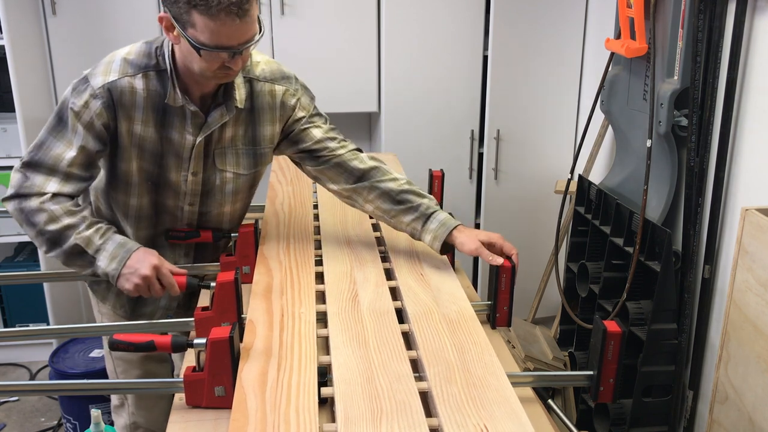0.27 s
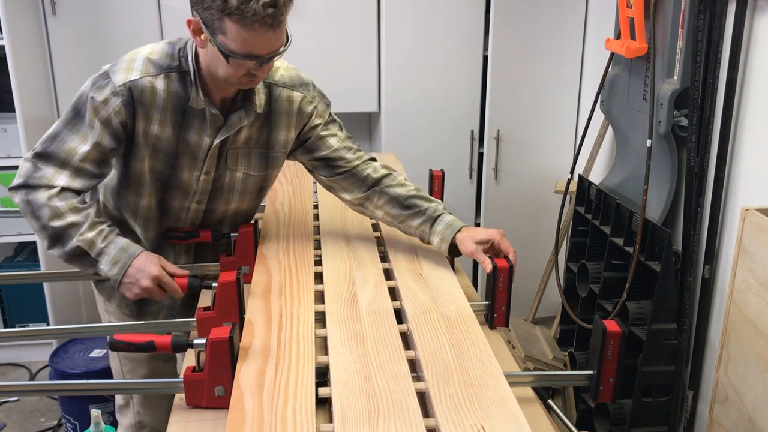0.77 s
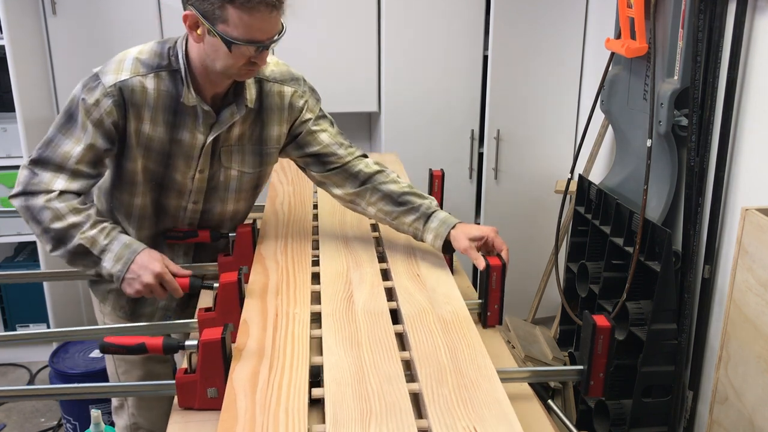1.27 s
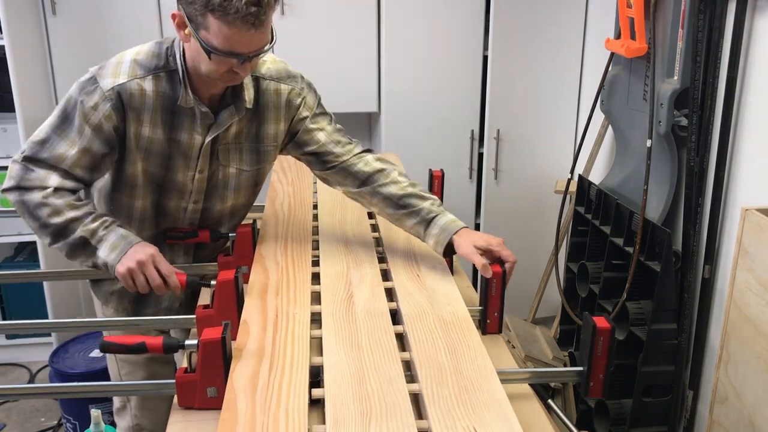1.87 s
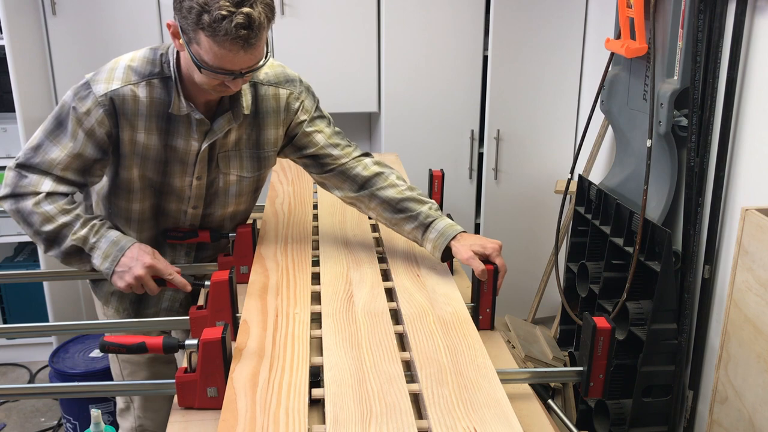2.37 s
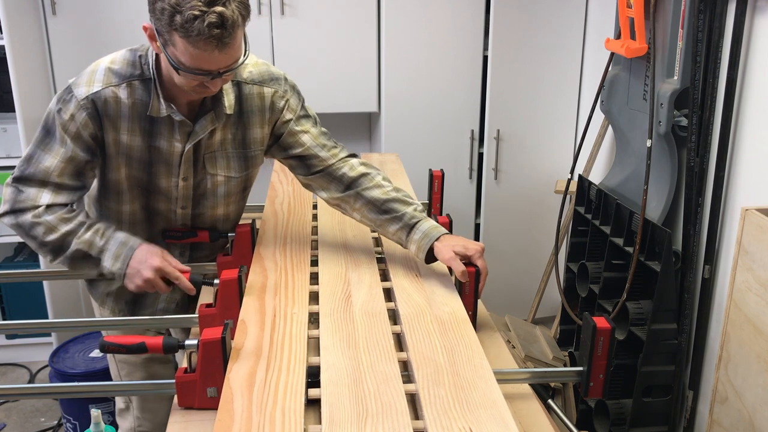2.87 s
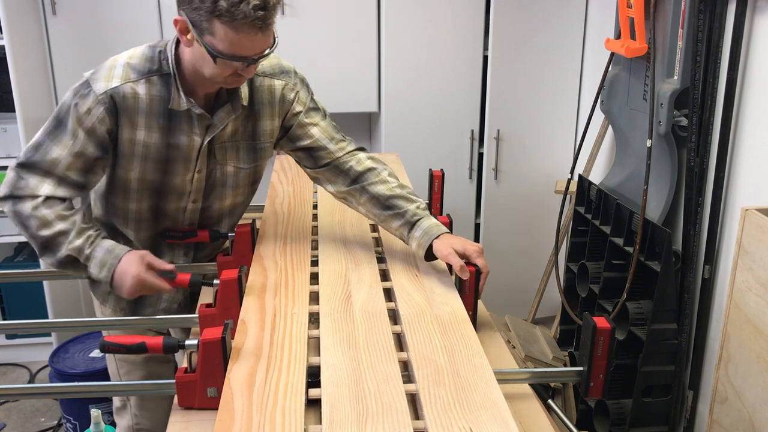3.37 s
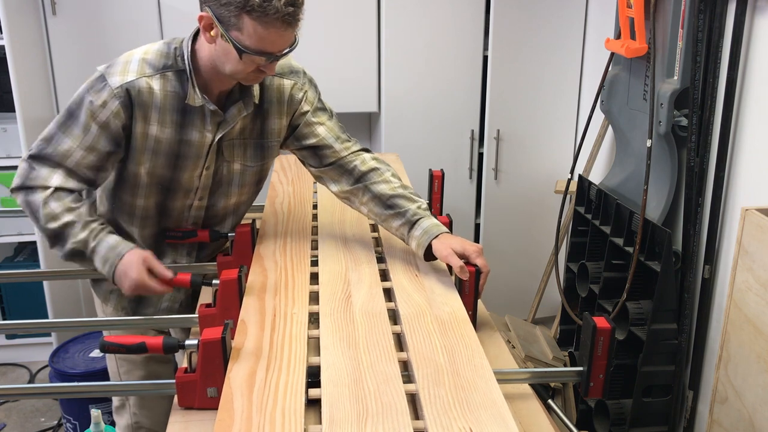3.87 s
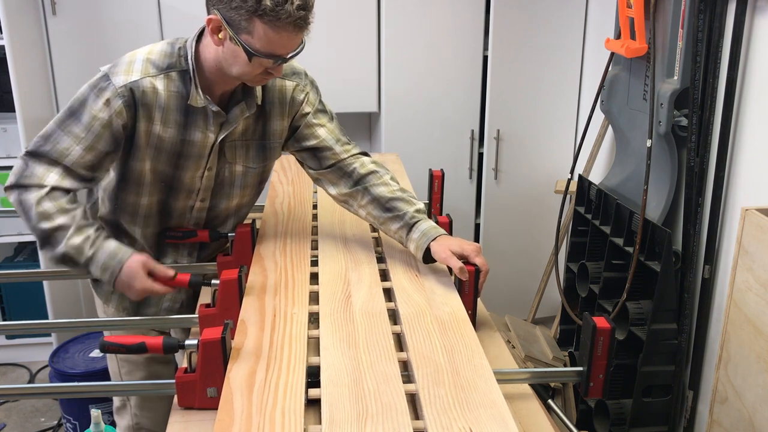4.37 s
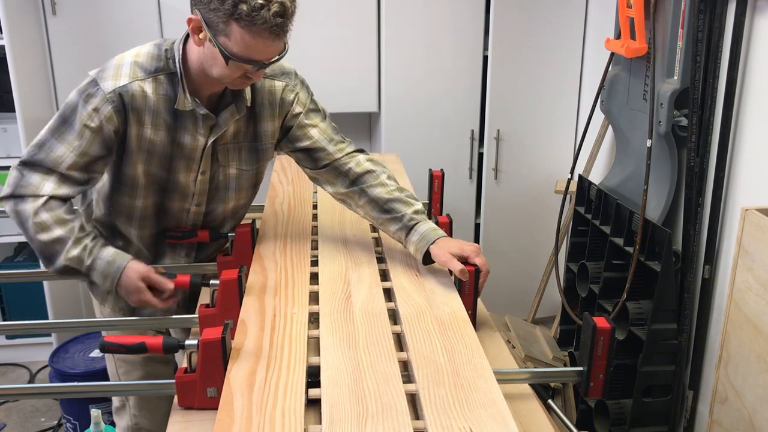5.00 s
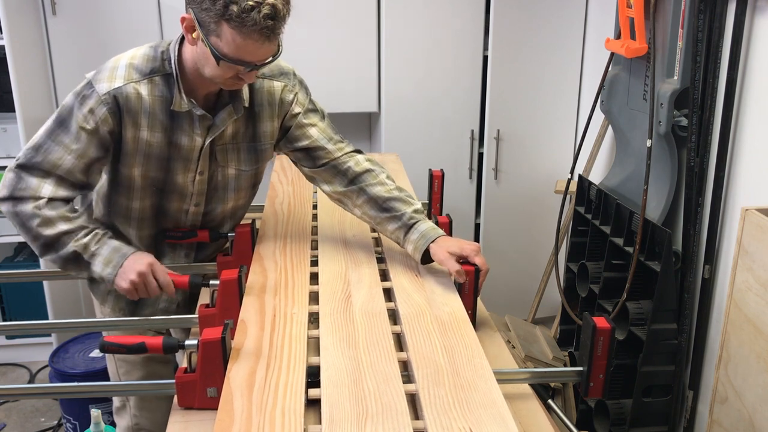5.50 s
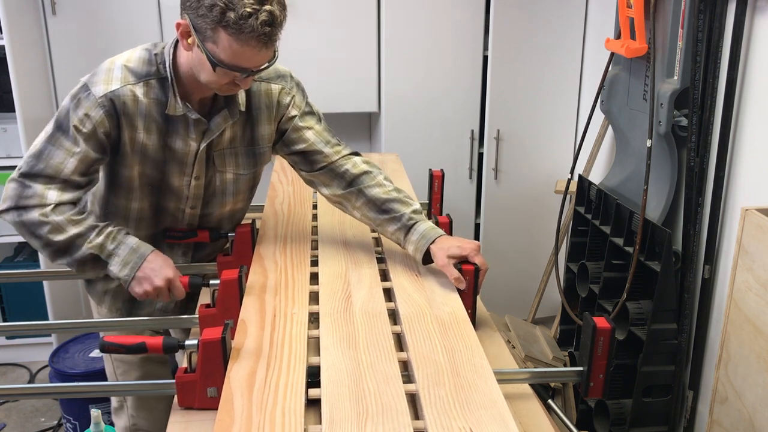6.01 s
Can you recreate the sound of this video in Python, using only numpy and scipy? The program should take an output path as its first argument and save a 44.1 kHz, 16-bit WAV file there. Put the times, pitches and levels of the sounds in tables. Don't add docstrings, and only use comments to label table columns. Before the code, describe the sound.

Metal bar clamps click, rattle and rasp against pine boards, with hollow wooden knocks on a bench in a small, hard-walled workshop.

```python
import sys
import numpy as np
from scipy import signal
from scipy.fft import rfft, irfft
from scipy.io import wavfile
from scipy.ndimage import uniform_filter1d

SR = 44100
rng = np.random.default_rng(int(sys.argv[2]) if len(sys.argv) > 2 else 0)


def magnitude_from_level(level_db):
    exponent = np.asarray(level_db, float) / 20
    return 10 ** exponent


def wav_out(sig):
    wavfile.write(sys.argv[1], SR, np.round(np.clip(np.atleast_2d(sig).T, -1, 1) * 32767).astype(np.int16))


N = 275625
TIME = np.arange(SR // 2) / SR

# pitch in Hz, level in dB, decay time t60 in seconds.
JAW_MODES = [(1620, -7, .07), (1900, -3, .09), (2200, -9, .15), (2330, -9, .15), (2388, 4, .055),
             (2475, -2, .05), (2580, -1, .045), (2660, -7, .04), (2860, -1, .05), (2925, -1, .05),
             (3180, -5, .12), (3400, -2, .1), (4060, -1, .07), (4400, -3, .06)]
BAR_MODES = [(4650, -2, .07), (5390, -4, .06), (5625, 0, .08), (5995, 3, .09), (6480, 0, .08),
             (6860, -1, .06), (7140, -4, .05)]
EDGE_MODES = [(7845, 0, .04), (8230, -2, .04), (8470, 1, .05), (8740, 2, .05), (9060, 1, .05),
              (9200, 1, .05), (9650, 1, .04), (11900, -3, .04), (12700, 0, .05), (13300, 2, .06),
              (14000, 1, .06), (14700, 1, .05), (15300, -3, .03)]
# pitch in Hz, level in dB, decay time t60 in seconds.
BOARD_MODES = [(610, -2, .12), (690, 2, .16), (745, 3, .16), (835, 5, .15), (895, 4, .15), (962, 10, .13),
               (1024, 6, .13), (1090, -3, .1), (1200, 2, .1), (1250, 0, .1), (1305, 2, .09), (1480, 0, .09)]
BENCH_MODES = [(222, -36, 0.021), (235, 1.5, 0.27), (253.8, 0, 0.29), (283.5, 6.5, 0.17), (345.2, 1, 0.15),
               (360, -6, 0.11), (497, -5, 0.22), (600, -9, 0.1)]
LEG_MODES = [(65, -10, 0.11), (82.2, 1, 0.56), (98.5, 19, 0.057), (138, -28, 0.085)]

# start in seconds, jaw peak in dB, bar in dB re jaw, edge in dB re jaw.
STRIKES = [(.1477, -29.5, -5.5, -17), (.2463, -36.5, -11, -15.5), (.4618, -40.5, -12.5, -10.5),
           (.5619, -47, 1, -3), (.5905, -42, -9, -11.5), (.7626, -44.5, -10, -14.5),
           (.9394, -30.5, -21, -17.5), (1.0809, -41.5, -16, -12), (1.0918, -38, -5.5, -20),
           (1.2003, -32, -5, -9), (1.269, -26.5, -14, -12.5), (1.2894, -47, 10, 3.5),
           (1.324, -30.5, -12, -11), (1.3594, -46.5, 3, -1.5), (1.8361, -43, -6.5, -16),
           (2.051, -50, 3.5, -10), (2.12, -49.5, -5, -10), (2.175, -49, -16, -11.5),
           (2.5113, -30.5, -14, -14), (2.762, -37, -11, -14), (2.7688, -25, -9, -11.5),
           (4.2775, -30, -2.5, -13.5), (4.6036, -45, -5.5, -14), (5.1175, -43, -6, -16.5),
           (5.3264, -45, 0, -14), (5.332, -33, -1.5, -11), (5.6282, -39, -7, -15),
           (5.6903, -29, -21, -15.5), (5.7156, -28.5, -14, -14)]
# start in seconds, jaw peak in dB, bar in dB re jaw, edge in dB re jaw, loudest ring in Hz.
SEATS = [(0.533, -37, -11, -20, 2600), (0.8745, -40, -12, -15, 2370), (.8826, -27.5, -13, -21, 2340),
         (0.8987, -24.5, -10, -17.5, 1860), (1.7907, -44, -5.5, -17, 2930), (2.0682, -38, -11, -25, 2780),
         (2.5636, -31.5, -16, -22, 2460), (2.6215, -20, -21, -34, 3470), (2.643, -24.5, -9, -19.5, 2660),
         (2.6694, -45, -20, -20, 3700), (2.894, -42.5, -24, -28, 2120), (2.939, -35.5, -22, -23.5, 2000),
         (3.3197, -33.5, -3, -16.5, 4570), (3.76, -38.5, -5, -18.5, 2490), (3.823, -41.5, -2, -18.5, 2650),
         (3.9816, -41, -10.5, -20.5, 2530), (4.781, -37.5, -6.5, -16, 2450),
         (5.0174, -34, -19, -21.5, 2530), (5.8427, -28.5, -17.5, -25, 2120), (6.074, -40.5, -18, -28, 2450)]
# start in seconds, jaw peak in dB,
# bar in dB re jaw.
TICKS = [(0.0436, -46.5, -8), (0.355, -46.5, -11), (0.419, -47, -12), (0.849, -60, -13),
         (1.612, -48.5, -8.5), (1.7744, -52, -8), (1.9548, -49.5, -17), (2.082, -59, -10),
         (2.2576, -51, -33), (2.502, -52, -2), (3.1248, -51, -15), (3.155, -48.5, -11), (3.618, -56, -36),
         (3.666, -51.5, -26), (3.7372, -52.5, -2), (4.1103, -47, -15), (4.499, -59, -28),
         (4.706, -50.5, -7.5), (4.891, -52.5, -12), (5.041, -43, -6), (5.529, -50.5, -13),
         (5.6045, -45, -16), (6.063, -51, -27), (6.145, -63, 4)]
# start in seconds, hold in seconds, steel level in dB, boards in dB re steel.
RASPS = [(0, 0.018, -46, -16.5), (0.168, 0.086, -46.5, 6.5), (0.573, 0.032, -46.5, -12),
         (0.853, 0.075, -42, -7), (1.054, .03, -47, 4.5), (1.256, 0.02, -37, 6.5), (1.362, 0.053, -44, -4),
         (1.483, 0.098, -53, 1), (2.063, 0.082, -47.5, -3.5), (2.368, 0.05, -56.5, -4),
         (2.53, .085, -36, -16), (2.602, 0.0081, -27.5, 4), (2.733, 0.08, -35.5, -4),
         (2.89, 0.067, -48, 6.5), (3.318, 0.12, -53.5, 2.5), (3.836, 0.21, -56.5, 2.5),
         (4.36, 0.016, -52, 0), (4.886, 0.023, -62, 11.5), (5.56, 0.085, -50.5, -7.5),
         (5.694, 0.037, -42, 3), (6.079, 0.047, -55, 6), (6.188, .06, -55, -15)]
# start
# in seconds, peak in dB.
DUST = [
    (2.2473, -67),
    (2.3156, -63),
    (2.356, -69),
    (2.3825, -69),
    (2.4189, -65),
    (2.4488, -68),
    (2.4787, -64),
        (6.0196, -69),
    (6.052, -59.5),
    (6.0674, -65),
    (6.0784, -61),
    (6.1089, -63),
    (6.1498, -69),
    (6.1702, -65),
    (6.1797, -59),
]

# start in seconds, peak in dB.
SLAPS = [(.148, -32), (.463, -31.5), (.582, -30.5), (.77, -39.5), (0.859, -35), (.879, -18.5),
         (0.89, -20.5), (.903, -28), (.937, -26), (1.09, -34.5), (1.262, -21.5), (2.513, -28.5),
         (2.547, -31), (2.56, -27.5), (2.6, -31), (2.631, -28), (2.65, -25.5), (2.748, -34), (2.767, -21.5),
         (2.892, -30.5), (2.937, -27.5), (5.477, -48), (4.281, -35.5), (4.501, -45), (4.7, -46.5),
         (4.788, -38.5), (4.892, -44.5), (5.017, -27), (5.343, -34.5), (5.678, -38), (5.697, -26.5),
         (5.716, -27.5), (5.844, -29), (6.06, -34.5), (6.075, -30.5)]
# start in seconds, peak in dB.
TOCKS = [(0.106, -46.5), (.171, -27.5), (0.185, -31), (0.359, -44.5), (0.522, -35), (0.538, -31.5),
         (.566, -35), (1.012, -37), (1.203, -28.5), (1.396, -43.5), (1.593, -48.5), (1.776, -42.5),
         (1.792, -44), (1.955, -42.5), (2.123, -46), (2.258, -36.5), (2.497, -43), (2.486, -50),
         (3.19, -45.5), (3.322, -39), (3.384, -42), (3.621, -52), (3.666, -48), (3.826, -51), (3.98, -39.5),
         (4.047, -45), (4.151, -49), (5.331, -44), (5.533, -45), (5.607, -38.5)]

# start in seconds, peak in dB, loudest ring in Hz.
RAPS = [(0.149, -28, 260), (0.258, -24, 266), (.295, -29, 252), (0.465, -30, 252), (0.505, -30.5, 245),
        (0.571, -21.5, 275), (3.762, -46, 300), (0.936, -28, 252), (1.037, -43, 274), (1.257, -12.5, 307),
        (1.271, -16.5, 343), (1.283, -24, 284), (1.55, -27, 243), (1.597, -30, 235), (1.8, -33, 260),
        (1.834, -43.5, 274), (2.125, -41.5, 250), (2.535, -29, 255), (2.514, -30, 300), (2.557, -23.5, 250),
        (2.601, -31, 443), (2.663, -25.5, 230), (2.755, -22, 260), (2.885, -45, 233), (3.866, -42, 270),
        (4.017, -43, 258), (4.635, -42, 280), (4.788, -42.5, 333), (5.322, -44, 255), (5.352, -39, 260),
        (5.695, -19, 260)]
# start in seconds, peak in dB, loudest ring in Hz.
THUDS = [(.11, -41.5, 233), (.181, -27, 260), (0.353, -37, 234), (0.528, -31.5, 289), (0.767, -35, 245),
         (0.867, -27.5, 280), (.895, -14.5, 255.4), (1.09, -23, 300), (1.201, -17, 337), (1.397, -26, 342),
         (1.713, -44.5, 318), (1.79, -38.5, 311), (2.154, -31.5, 244), (2.176, -31, 243),
         (2.395, -38.5, 288), (2.789, -23.5, 223), (2.949, -38, 300), (3.169, -35.5, 235),
         (3.337, -34.5, 235), (3.713, -44, 310), (3.985, -42, 256), (4.137, -41.5, 367),
         (4.385, -39.5, 250), (4.89, -40, 325), (5.018, -33, 480), (5.609, -33.5, 239), (5.722, -23.5, 276),
         (5.851, -30, 400), (6.082, -41, 450), (6.173, -39.5, 230)]
# start in seconds, hold in seconds, bench top level in dB, legs in dB re top.
SHOVES = [(0, 0.0076, -52.5, -5), (0.184, 0.095, -39, -1), (0.534, 0.12, -42, -1.5),
          (0.885, 0.15, -36.5, -2.5), (1.248, 0.02, -24.5, -1.5), (1.358, 0.029, -29.5, -9),
          (1.558, 0.022, -37, 0), (1.968, 0.041, -48.5, -3), (2.125, 0.061, -48, 3),
          (2.285, 0.069, -52.5, -10), (2.52, 0.1, -30, -9), (2.744, 0.022, -35, -5),
          (2.912, 0.017, -34.5, -5), (3.286, 0.19, -50.5, -7), (3.717, 0.071, -57, -10),
          (3.857, 0.33, -55, 0), (4.277, 0.12, -50, 1), (4.553, 0.18, -56, -3), (4.78, 0.15, -54.5, 2),
          (5.105, 0.01, -46.5, -6.5), (5.505, 0.043, -47.5, -4), (5.696, 0.019, -31.5, -7),
          (5.883, 0.023, -56, 6.5), (6.072, 0.036, -42, -8)]

# start in seconds, peak in dB, ring in Hz, decay time t60 in seconds.
WOOD_RINGS = [(.172, -37.5, 495, 0.24), (.25, -36, 495, 0.23), (.563, -31, 480, 0.26),
              (.58, -31, 495, 0.22), (.625, -40, 520, 0.081), (.879, -25, 970, 0.11),
              (.891, -18, 964, 0.14), (.9, -24, 790, 0.1), (.937, -25, 953, .06), (.954, -26, 977, .06),
              (1.203, -23, 930, 0.068), (1.222, -26.5, 670, 0.22), (1.264, -10, 105, .1),
              (1.259, -10, 353, 0.073), (1.261, -15, 255, .11), (1.273, -10, 350, 0.06),
              (1.206, -17.5, 348, 0.16), (.9, -36, 502, .1), (0.89, -29, 1420, .08), (.937, -20, 265, .1),
              (.905, -23, 950, 0.066), (2.258, -36, 980, .1), (1.284, -25, 700, 0.11),
              (1.308, -20, 246, .12), (2.512, -25.5, 1030, 0.095), (2.563, -24, 1050, 0.091),
              (2.563, -26.5, 1520, 0.065), (2.608, -30, 1500, .08), (2.631, -24.5, 910, 0.11),
              (2.645, -24.5, 823, 0.12), (2.662, -27, 690, .12), (2.768, -27, 970, 0.043),
              (2.79, -31.5, 498, 0.2), (3.98, -43, 877, 0.13), (4.282, -36.5, 860, 0.1),
              (5.714, -27, 1180, 0.053), (5.86, -41, 500, .2), (6.075, -40, 1200, 0.13),
              (2.749, -34, 1500, .05), (5.694, -34, 737, .12), (5.334, -43, 940, .1),
              (5.844, -36, 1010, .2), (2.666, -24.5, 235, 0.21), (2.545, -29, 249, .15),
              (5.345, -39, 900, .2)]
STEEL_RINGS = [(5.844, -44, 2580, .2), (.865, -55, 13300, .15), (.879, -28, 2370, 0.14),
               (.905, -30, 3950, .05), (.905, -54, 13600, .12), (6.075, -45, 2390, .09),
               (1.096, -59, 14050, .17), (1.203, -40, 8700, .08), (1.29, -36, 9700, 0.045),
               (5.117, -47, 2400, .09), (.938, -33, 2400, .05), (2.598, -35, 2350, .06),
               (2.561, -39, 4050, .05), (2.622, -26, 3470, .07), (2.624, -33, 4650, 0.14),
               (2.63, -38, 6900, .12), (2.641, -26.5, 2500, 0.071), (2.578, -34, 2450, .05),
               (2.769, -38, 2045, .05), (2.939, -42, 2858, 0.04), (4.279, -35.5, 2379, 0.074),
               (4.279, -50, 5996, .08), (4.605, -48.5, 2384, 0.064), (5.332, -35.5, 2400, 0.073),
               (5.714, -34, 2374, .08), (5.716, -46, 9000, .06), (5.72, -53, 14200, .08),
               (5.85, -47, 2270, 0.4), (5.86, -64, 14000, 0.21), (6.061, -49, 2869, .05),
               (6.075, -66, 14800, .1), (5.844, -43, 3980, .1), (5.845, -47, 2160, 0.39),
               (5.691, -37, 3300, 0.12), (5.715, -38, 4050, 0.11), (5.845, -40, 3250, 0.066),
               (4.279, -44, 4100, .12), (4.782, -52, 5630, .07), (4.782, -37.5, 2890, 0.057),
               (5.017, -41, 3420, .05), (5.628, -45, 9100, .04), (1.202, -38, 3050, 0.035),
               (1.324, -31, 3060, 0.043), (.463, -42, 2400, 0.08), (3.157, -51, 2900, .04),
               (3.76, -48, 2850, .05), (2.77, -44, 12730, .06), (2.513, -52, 14500, .06),
               (6.075, -48, 3330, .1), (6.075, -46, 2850, .09)]

# rise in dB per second, fall in dB per second, rest level in dB.
STEEL_PACE = (216, 174, -99)
PINE_PACE = (320, 177, -73)
TOP_PACE = (370, 163, -64)
LEG_PACE = (250, 99, -62)

# pitch in Hz, level in dB per Hz.
AIR_COLOUR = [(32, 1.5), (80, 13.5), (170, -29), (263, 13.5), (420, -7.5), (988, 0), (1710, -15),
              (2390, -13), (4890, -24), (10500, -24), (15000, -22)]


def clamp():
    def spot_hz(rows):
        return 2560 * np.exp(0.13 * rng.standard_normal((len(rows), 1)))

    strikes = np.hstack([STRIKES, spot_hz(STRIKES)])
    ticks = np.array(TICKS)
    tick_edge_db = -17.5 + 0.4 * ticks[:, 2:]
    ticks = np.hstack([ticks, tick_edge_db, spot_hz(ticks)])
    s, db, bar_db, edge_db, hz = np.vstack([strikes, SEATS, ticks]).T

    jaw = voice(JAW_MODES, crack_db=4.44, wet_db=7.3, room_t60=0.34)
    bar = voice(BAR_MODES, crack_db=6.3, wet_db=8.1, room_t60=0.31)
    edge = voice(EDGE_MODES, crack_db=2.9, wet_db=10.2, room_t60=0.25)
    clicks = blows(jaw, s, db - 5.0, contact_ms=0.81, hz=hz, focus=0.28)
    clicks += blows(bar, s, db + bar_db - 4.5, contact_ms=2.0)
    clicks += blows(edge, s, db + edge_db + 3, contact_ms=1.94)

    start, hold, steel_db, _ = np.transpose(RASPS)
    rasp_db = effort(start, hold, steel_db, STEEL_PACE)
    rasp = chatter(jaw, rasp_db - 14.5, per_s=500, scatter_db=6.8)
    rasp += chatter(bar, rasp_db - 22, per_s=1500, scatter_db=2.7)
    rasp += chatter(edge, rasp_db - 20.5, per_s=1500, scatter_db=2.3)
    return clicks + rasp + dust()


def dust():
    speck = band(fade(.03) * rng.standard_normal(len(TIME)), 13000, 17000)
    s, db = np.transpose(DUST)
    crackle = chatter(speck, -89, per_s=40, scatter_db=4)
    return crackle + blows(speck / np.abs(speck).max(), s, db + 9.0, contact_ms=.6)


def boards():
    s, db = np.transpose(SLAPS + TOCKS)
    counts = [len(SLAPS), len(TOCKS)]
    contact_ms = np.repeat([1.85, 0.73], counts)
    main_ring = np.repeat([0.079, 0.4], counts)[:, None]
    board = voice(BOARD_MODES, crack_db=1.5, wet_db=16.6, room_t60=0.31)
    taps = blows(board, s, db - 4.0, contact_ms, hz=960.0, focus=main_ring)

    dry_ring = np.sin(2 * np.pi * 950 * TIME) * fade(0.06)
    tock_s, tock_db = np.transpose(TOCKS)
    corner = blows(dry_ring, tock_s, tock_db - 5.0, contact_ms=0.51, hz=870, focus=2.0)

    start, hold, steel_db, pine_db = np.transpose(RASPS)
    creep_db = effort(start, hold, steel_db + pine_db, PINE_PACE)
    return taps + corner + chatter(board, creep_db - 5.0, per_s=300, scatter_db=6.1)


def rings():
    s, db, hz, t60 = np.transpose(WOOD_RINGS + STEEL_RINGS)[:, :, None]
    waver = uniform_filter1d(rng.standard_normal((len(s), len(TIME))), size=SR // 200, axis=1)
    waver *= .007 / waver.std() * (1000 / hz) ** 0.11
    phase = 2 * np.pi * np.cumsum(hz * (1 + waver), axis=1) / SR
    swell = np.tanh(TIME / (1.5 / hz + 0.0012))
    tone = magnitude_from_level(db) * np.sin(phase) * fade(np.abs(t60)) * swell
    out = np.zeros(N + SR)
    np.add.at(out, (s * SR).astype(int) + np.arange(len(TIME)), tone)
    return out[:N]


def bench():
    s, db, hz = np.transpose(RAPS + THUDS)
    contact_ms = np.repeat([2.48, 5.9], [len(RAPS), len(THUDS)])
    contact_ms = contact_ms + 0.17 * (db + 24.5)
    top = voice(BENCH_MODES, crack_db=-3.5, wet_db=5.4, room_t60=0.29)
    legs = voice(LEG_MODES, crack_db=-16.0, wet_db=0.86, room_t60=0.42)
    knocks = blows(top, s, db - 4.5, contact_ms, hz, focus=0.19)

    start, hold, top_db, leg_db = np.transpose(SHOVES)
    shove_db = effort(start, hold, top_db, TOP_PACE)
    boom_db = effort(start + 0.012, hold, top_db + leg_db, LEG_PACE)
    shoves = chatter(top, shove_db - 4.5, per_s=90, scatter_db=4.6)
    return knocks + shoves + chatter(legs, boom_db - 3.0, per_s=300, scatter_db=0.76)


def voice(modes, crack_db, wet_db, room_t60):
    ring = sum(magnitude_from_level(db) * np.sin(2 * np.pi * hz * TIME) * fade(t60) for hz, db, t60 in modes)
    room = rng.standard_normal(len(TIME)) * fade(room_t60)
    spectrum = rfft(room)
    evenness = np.sqrt(uniform_filter1d(np.abs(spectrum) ** 2, size=120))
    room = irfft(spectrum / evenness, len(TIME))
    room *= np.clip(TIME / 0.00098 - .5, 0, 1) * (TIME < .4)
    room *= magnitude_from_level(wet_db) / np.sqrt(np.sum(room ** 2))
    room[0] = 1
    lowest_hz, highest_hz = modes[0][0], modes[-1][0]
    crack = band(room, lowest_hz, highest_hz)
    heard = ring / ring.std() + magnitude_from_level(crack_db) * crack / crack.std()
    heard = band(heard, 0.94 * lowest_hz, 1.335 * highest_hz)
    loudest = uniform_filter1d(heard ** 2, size=SR // 200).max()
    return heard / np.sqrt(loudest)


def blows(response, times, db, contact_ms, hz=0, focus=0):
    short = TIME[:SR // 10]
    contact_ms = np.clip(contact_ms, .1, 20) * np.ones_like(times)
    t = short / contact_ms[:, None] * 1000
    swell = t * np.exp(-t)
    rough = rfft(rng.standard_normal(t.shape) * swell)
    knots = np.log(np.fft.rfftfreq(len(short), 1 / SR) + 100) * 8
    patch_rows = rng.standard_normal((len(times), 60))
    patch_db = 2.5 * np.array([np.interp(knots, np.arange(60), row) for row in patch_rows])
    rough = irfft(magnitude_from_level(patch_db) * rough / np.abs(rough), len(short))
    rough *= np.tanh(3 * t) * np.exp(-t / 3)
    spot = np.cos(2 * np.pi * np.outer(hz * np.ones_like(times), short)) * swell
    push = rough / rough.std(axis=1, keepdims=True)
    push = push + focus * spot / spot.std(axis=1, keepdims=True)
    power = np.abs(rfft(response)) ** 2
    passed = np.abs(rfft(push, len(response))) ** 2 @ power / power.sum()
    push = push * (magnitude_from_level(db) / np.sqrt(passed))[:, None]
    force = np.zeros(N + SR)
    np.add.at(force, (times * SR).astype(int)[:, None] + np.arange(len(short)), push)
    return signal.fftconvolve(force, response)[:N]


def chatter(response, db, per_s, scatter_db):
    sizes = magnitude_from_level(scatter_db * np.minimum(rng.exponential(size=N), 2))
    sizes *= np.sign(rng.standard_normal(N))
    slips = (rng.random(N) < per_s / SR) * sizes
    slips *= magnitude_from_level(db) / slips.std()
    return signal.fftconvolve(slips, response / np.sqrt(np.sum(response ** 2)))[:N]


def effort(start, hold, db, pace):
    rise, fall, rest_db = pace
    t = np.arange(0, N, 64)[:, None] / SR
    before = np.maximum(start - t, 0)
    after = np.maximum(t - start - np.abs(hold), 0)
    stroke_db = db - rise * before - fall * after
    level_db = np.maximum(stroke_db.max(axis=1), rest_db)
    return np.interp(np.arange(N) / SR, t[:, 0], level_db)


def fade(t60):
    return np.exp(-np.log(1000) * TIME / t60)


def band(x, lo_hz, hi_hz):
    sos = signal.butter(2, [lo_hz, min(hi_hz, .45 * SR)], "band", fs=SR, output="sos")
    return signal.sosfilt(sos, x)


def air():
    hz, db = np.transpose(AIR_COLOUR)
    bins = np.maximum(np.fft.rfftfreq(N, 1 / SR), 1)
    colour = magnitude_from_level(np.interp(np.log(bins), np.log(hz), db))
    hiss = irfft(rfft(rng.standard_normal(N)) * colour, N)
    return hiss / hiss.std() * magnitude_from_level(-60.5)


def scene():
    work = clamp() + boards() + rings() + bench()
    return (band(work, 59.0, 13700) + air())[None]


def band_limit(x):
    return signal.sosfilt(signal.butter(12, 16430, fs=SR, output="sos"), x)


def record(dry):
    port = signal.lfilter(*signal.iirpeak(10400, 9, fs=SR), dry)
    top_cut = signal.ellip(10, .2, 80, 15850, fs=SR, output="sos")
    mix = signal.sosfilt(top_cut, dry - 0.31 * port)
    return band_limit(mix)


dry = scene()
out = record(dry)
wav_out(out)
```